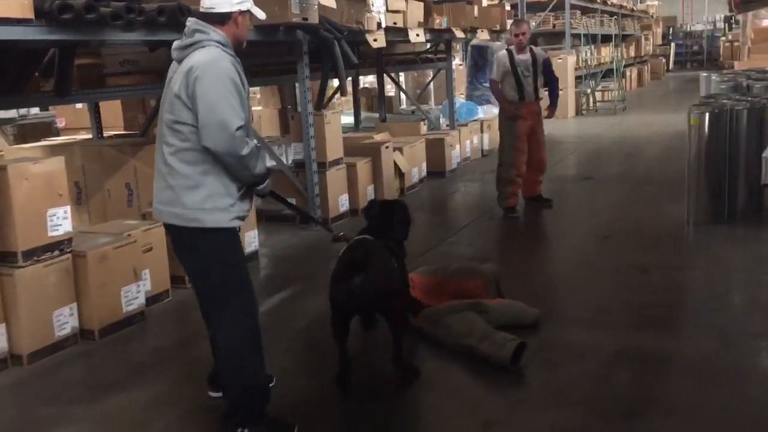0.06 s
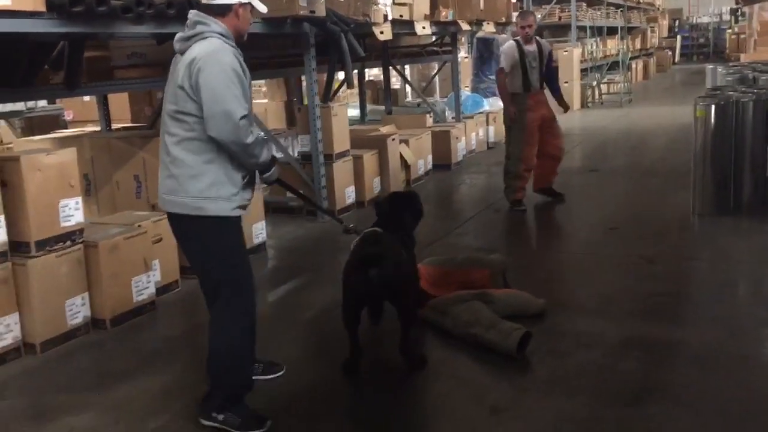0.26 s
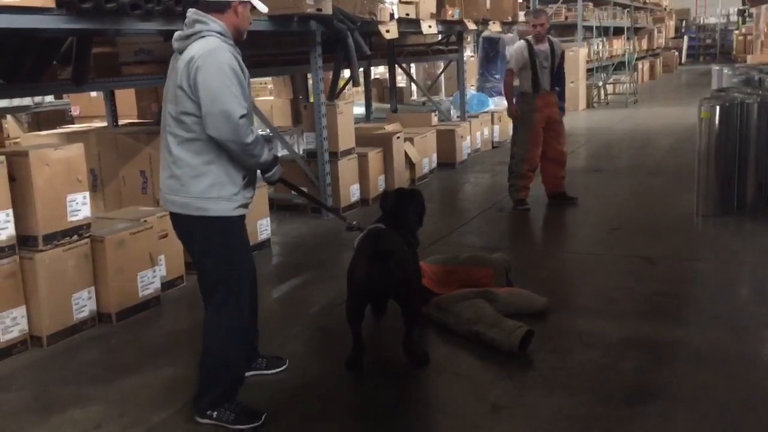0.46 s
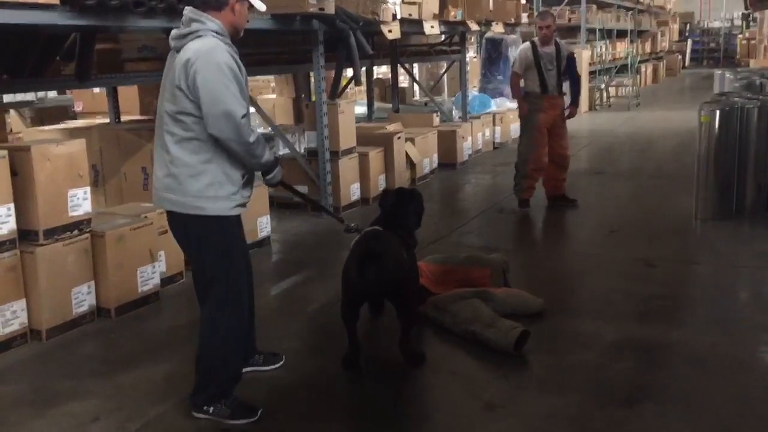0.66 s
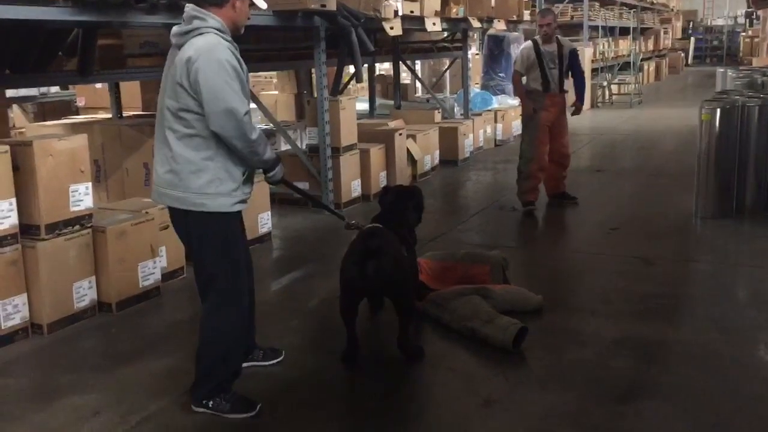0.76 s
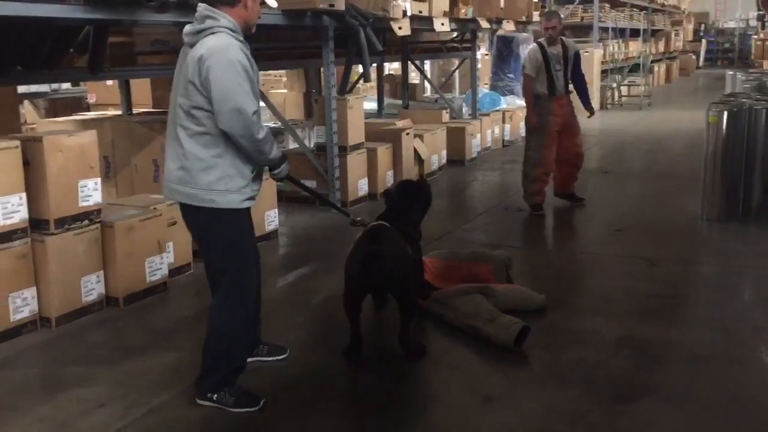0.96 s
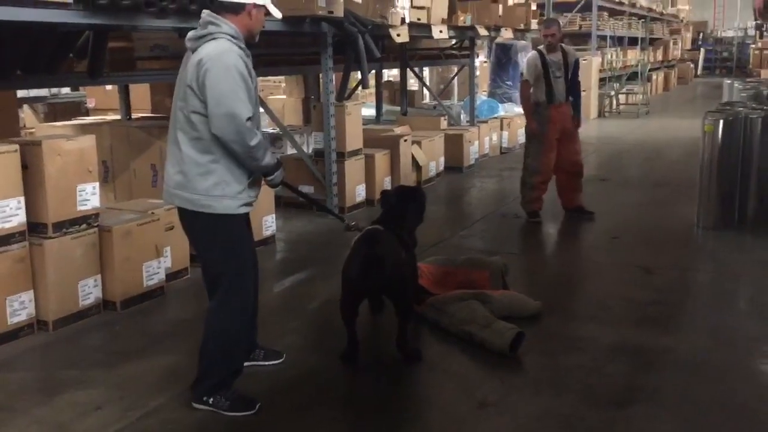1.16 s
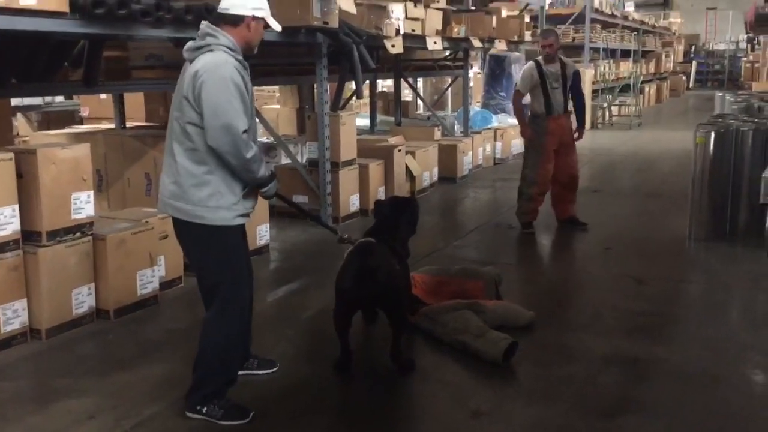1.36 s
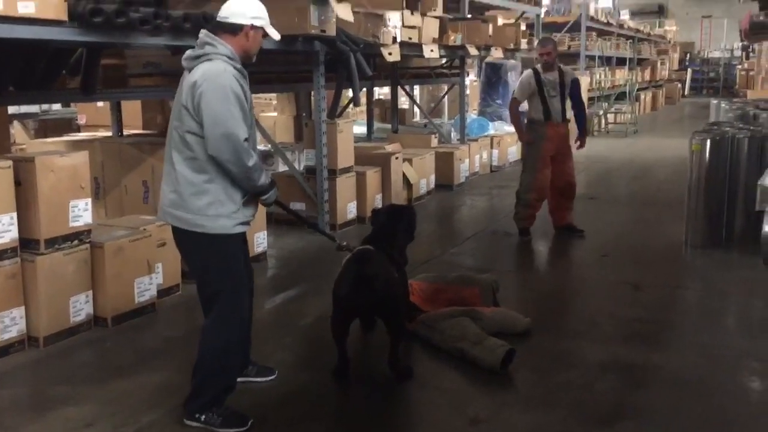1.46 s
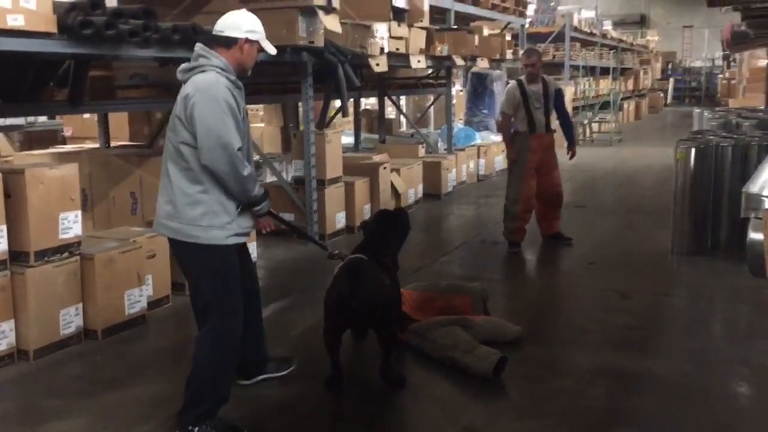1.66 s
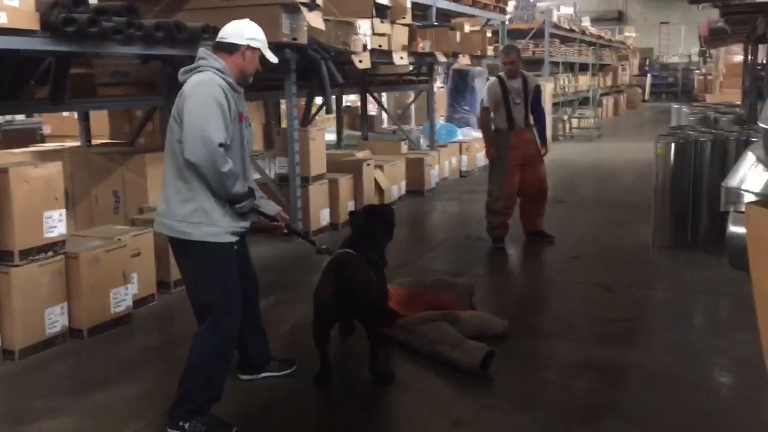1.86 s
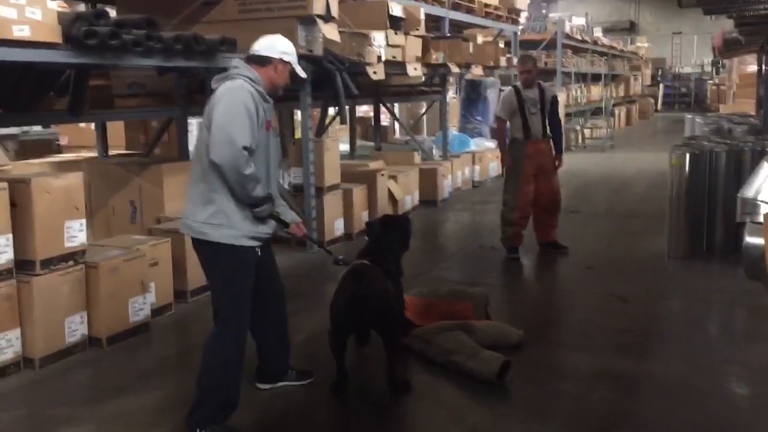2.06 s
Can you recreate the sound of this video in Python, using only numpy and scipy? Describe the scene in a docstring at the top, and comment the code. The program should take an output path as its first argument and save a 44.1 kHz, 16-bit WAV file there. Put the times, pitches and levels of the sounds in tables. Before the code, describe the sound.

The echo of an earlier bark fades, then a big dog barks three times, with a tiny shoe squeak and faint scuffs between; the warehouse racks and far wall return long reverberation, heard from a few metres.

```python
"""The echo of an earlier bark is dying away over faint ventilation; then a large dog barks three times.
It stands a few metres from the microphone in a big warehouse. Harmonics and puffs of noise excite a
throat filter that crossfades from an open burst to a hoarse, nearly shut hoot of falling pitch.
A leash rustles and shoes scuff (filtered noise); a rubber sole squeaks (a gliding tone). The racks
scatter it all, the hall reverberates and the far wall throws it back: decaying noise, convolved."""
import sys
import numpy as np
from scipy import signal
from scipy.io import wavfile
from scipy.ndimage import uniform_filter1d, minimum_filter1d

SR = 44100
rng = np.random.default_rng(int(sys.argv[2]) if len(sys.argv) > 2 else 0)


def store_wav(level_fs):
    """Save 16-bit WAV to argv[1]."""
    pcm = np.round(np.clip(np.atleast_2d(level_fs), -1, 1) * 32767)
    wavfile.write(sys.argv[1], SR, pcm.T.astype(np.int16))


N = 92610  # samples, 2.1 s

# Glottal course of each bark: [t/s, pitch f/Hz, level/dB, roughness/0-1]
BARKS = [
    [(0.184, 264.8, -29, 0.97), (0.208, 297.4, -15, 0.42), (0.234, 353.8, -8.5, 0.3),
     (0.25, 376.1, -11, 0.2), (0.268, 426.2, -9.5, 0.72), (0.282, 446.5, -14, 0),
     (0.315, 438.9, -15.5, 0.2), (0.336, 407.3, -21, 0.48), (0.35, 357.2, -15.5, 0),
     (0.372, 255.9, -22, .2), (0.42, 183.6, -35, 0.1)],
    [(0.902, 288.8, -26.5, 1), (0.92, 337.2, -13, 0.35), (0.942, 355.8, -9.5, 0.22),
     (0.968, 365.7, -10, 0.25), (0.984, 431.6, -21.5, 0), (1.014, 412.9, -17.5, 0.3),
     (1.032, 400.8, -22.5, .7), (1.046, 404.4, -13.5, 0.31), (1.059, 364.2, -12, 0.25),
     (1.08, 280.4, -20.5, 0.1), (1.145, 164, -43, 0)],
    [(1.618, 276.8, -26.5, 0.63), (1.632, 319.3, -18.5, 0.36), (1.657, 345.7, -10, 0.4),
     (1.68, 393, -13.5, 0.4), (1.713, 426, -24, 0.3), (1.74, 423.3, -15.5, .45), (1.761, 422.2, -21, 0.64),
     (1.774, 354.1, -11.5, 0.17), (1.794, 265.5, -19, 0.42), (1.85, 168, -34, 0)],
]
# How much each bark stresses the sharp upper throat resonance: [gain]; a negative gain weakens it
BITES = [0, 0.18, -0.39]
BITE_HZ, BITE_WIDTH_HZ = 1716, 200
# Period jitter (share of pitch at full roughness) and its bandwidth
JITTER, JITTER_HZ = 0.076, 172.8
# At full roughness: strong-weak alternation of cycles, random strength (shares), and its bandwidth
DOUBLING, SHIMMER, SHIMMER_HZ = 0.44, 0.64, 142
# Air in each cycle: decay (cycles), steady share beside a pulse of 1, high-pass corner
PUFF_CYCLES, PUFF_FLOOR, PUFF_LOW_HZ = 0.35, 0.9, 291.7
FOLDS_DB = -7.5  # voiced part against the puffs


def glottis(hz, rough, bite):
    """Source of the source-filter model: a harmonic series gives way to pulsed turbulence with roughness."""
    n = len(hz)
    turns = np.cumsum(hz * (1 + JITTER * rough * wobble(n, JITTER_HZ))) / SR  # cycles elapsed
    folds = sum(np.cos(2 * np.pi * k * turns) for k in range(1, 17))
    alternation = DOUBLING * np.cos(np.pi * turns)
    folds = folds * (1 + rough * (alternation + SHIMMER * wobble(n, SHIMMER_HZ)))
    airflow = PUFF_FLOOR + np.exp(-(turns % 1) / PUFF_CYCLES)
    puffs = cut(airflow * noise(n), PUFF_LOW_HZ, "high", order=6)
    drive = (1 - rough) * amp(FOLDS_DB) * unit(folds) + rough * unit(puffs)
    resonance = signal.iirpeak(BITE_HZ, BITE_HZ / BITE_WIDTH_HZ, SR)
    return drive + bite * signal.lfilter(*resonance, drive), puffs


# Mouth opening: [t/s since onset, openness/0-1]
MOUTH = [(0, 1), (.055, 1), (.09, 0.36), (.15, 0.37), (.2, 0)]
# Throat transfer with the mouth open, then nearly shut: [f/Hz, level/dB]
OPEN = [(30, -44), (170, -7.5), (335, -6.5), (520, 0), (690, 1.5), (870, -5.5), (1150, -8), (1360, -1.5),
        (1560, -14), (1720, -7), (1795, 3.5), (1880, -7), (2120, -20), (2330, -24), (2550, -29),
        (4000, -80), (15500, -97)]
SHUT = [(30, -82), (110, -15.5), (170, -12), (280, -10.5), (430, 6.5), (530, -13.5), (680, -10.5),
        (870, -12.5), (970, -26.5), (1120, -6), (1550, -23), (1720, -11.5), (1800, -10), (1900, -40.5),
        (2150, -45), (2600, -30), (4000, -49.5), (15500, -75)]
# Rasp of air in the open mouth: [f/Hz, level/dB], relative spectrum
RASP = [(1500, -38.5), (2400, -4), (3200, -2), (4200, -4.5), (4900, -11), (6500, -21.5), (8500, -21),
        (10500, -32.5), (15500, -33.5)]
# Rasp level when the voice is at RASP_AT_DB; dB gained per dB of voice
RASP_DB, RASP_AT_DB, RASP_GROWTH = -30, -7, 2.14
# Hiss through the teeth as the jaw closes: [f/Hz, level/dB], relative spectrum
TEETH = [(1500, 2.5), (2500, 1.5), (3300, -18), (4300, 1.5), (5200, -9.5), (6400, -1.5), (7400, -20),
         (9000, -19), (11000, -29), (15500, -28)]
TEETH_DB, TEETH_S, TEETH_SPREAD_S = -44.5, 0.12, 0.053  # peak level, its time, Gaussian spread
# Low noise thump under the loud onset: level against the voice, low-pass corner
THUMP_DB, THUMP_HZ = -40.5, 190
ATTACK_S, RELEASE_S = 0.014, 0.011


def bark(rows, bite):
    """Source-filter principle: the throat's resonances shape the glottal drive; noise bands add to it."""
    t, hz, db, rough = follow(rows)
    rough = np.clip(rough, 0, 1)
    n, age = len(t), t - t[0]
    drive, puffs = glottis(hz, rough, bite)
    mouth = np.clip(np.interp(age, *np.transpose(MOUTH)), 0, 1)
    voice = mouth * unit(colour(drive, OPEN)) + (1 - mouth) * unit(colour(drive, SHUT))
    low_noise = cut(cut(noise(n), THUMP_HZ, "low"), 30, "high")
    thump = amp(THUMP_DB) * mouth ** 2 * unit(low_noise)
    rasp_db = RASP_DB + RASP_GROWTH * (db - RASP_AT_DB)
    rasp = amp(rasp_db) * mouth * unit(colour(puffs, RASP))
    closing = np.exp(-.5 * ((age - TEETH_S) / TEETH_SPREAD_S) ** 2)
    hiss = amp(TEETH_DB) * closing * unit(colour(noise(n), TEETH))
    edges = np.clip(np.minimum(age / ATTACK_S, (t[-1] - t) / RELEASE_S), 0, 1)
    return edges * (amp(db) * (voice + thump) + rasp + hiss)


# Glide of the rubber sole: [t/s, pitch f/Hz, level/dB]
SQUEAK = [(.692, 3080, -65.5), (.708, 3550, -49.5), (.724, 3550, -54), (.737, 3800, -65), (.75, 3750, -66),
          (.76, 3800, -75.5)]
SQUEAK_JITTER, SQUEAK_OCTAVE_DB = .05, -14.5  # rms share of pitch; second harmonic against the first


def squeak():
    """Frequency modulation: phase integrates a rising, jittered pitch, with a weak second harmonic."""
    t, hz, db = follow(SQUEAK)
    phase = 2 * np.pi * np.cumsum(hz * (1 + SQUEAK_JITTER * wobble(len(t), 700))) / SR
    tone = np.sin(phase) + amp(SQUEAK_OCTAVE_DB) * np.sin(2 * phase)
    return amp(db) * unit(tone)


# Soft rustles and scuffs, a leash rustle at 0.168 s, then shoe scuffs: [t/s, length/s, level/dB]
RUSTLES = [(0.168, 0.05, -57), (0.475, 0.2, -59), (0.757, 0.012, -63), (1.236, 0.053, -61),
           (2.034, 0.023, -61)]
# Spectrum of a rustle or scuff: [f/Hz, level/dB]
RUSTLE_COLOUR = [(500, -15), (2500, 1), (6000, -4.5), (9000, -10), (15000, -19.5)]


def rustle(length, level):
    """Friction as broadband noise: filtered randomness under a smooth window."""
    n = int(length * SR)
    return amp(level) * np.hanning(n) ** .5 * unit(colour(noise(n), RUSTLE_COLOUR))


# Hall tail: decay [f/Hz, T60/s], then spectrum [f/Hz, level/dB]
HALL_T60 = [(100, .4), (250, .55), (430, 0.88), (900, 0.99), (1800, 1.07), (2600, 1.48), (4300, 0.96),
            (8000, 0.45), (15000, 0.71)]
HALL_COLOUR = [(100, 10), (340, -2.5), (395, 6), (435, 6.5), (490, -15.5), (800, -0.5), (1800, -10),
               (2800, -1.5), (6000, 3), (15000, 3.5)]
# Single reflections from floor and cartons: [delay t/s, gain]
BOUNCES = [(.0047, 0.1), (.0108, 0.2), (0.0179, 0.087)]
# What the far wall returns: [f/Hz, level/dB]
FAR_COLOUR = [(150, -18), (340, -2.5), (435, 7), (510, -6), (700, -0.5), (1300, -2), (1800, -1.5),
              (2500, -5), (7000, -16.5), (15000, -9)]
# Energy of each part against the direct sound (dB), build-up and decay times (s)
HALL_DB, HALL_SWELL_S = -10.5, 0.099
RACKS_DB, RACKS_SWELL_S, RACKS_T60 = -8.5, 0.002, 0.47
FAR_DB, FAR_S, FAR_SWELL_S, FAR_T60 = -29, 0.23, 0.073, 0.99  # FAR_S: the echo's delay


def warehouse(x):
    """Linear room acoustics: convolution with direct sound, reflections, scatter, tail and smeared echo."""
    t = np.arange(N) / SR
    hz, at, bands = signal.stft(colour(noise(N), HALL_COLOUR), SR, nperseg=512)
    decay = amp(-60 * at / read(HALL_T60, hz)[:, None])  # each band falls 60 dB in its own T60
    hall = signal.istft(bands * decay, SR, nperseg=512)[1][:N]
    hall = hall * np.clip(t / HALL_SWELL_S, 0, 1)
    racks = noise(N) * amp(-60 * t / RACKS_T60) * np.clip(t / RACKS_SWELL_S, 0, 1)
    far = colour(noise(N), FAR_COLOUR) * amp(-60 * t / FAR_T60)
    far = far * np.clip((t - FAR_S) / FAR_SWELL_S, 0, 1)
    parts = [(HALL_DB, hall), (RACKS_DB, racks), (FAR_DB, far)]
    response = sum(amp(db) * part / np.linalg.norm(part) for db, part in parts)
    response[0] += 1  # direct sound
    for s, gain in BOUNCES:
        response[round(s * SR)] += gain
    return signal.fftconvolve(x, response)[SR:SR + N]  # drops the early second


# Ventilation spectrum: [f/Hz, level/dB per Hz], relative
AIR = [(22, -55), (40, -14.5), (65, -12), (120, -6), (210, -19), (500, -14.5), (1500, -11), (3000, -45.5),
       (8000, -46), (15500, -61.5)]
AIR_DB = -50  # overall rms level


def ventilation():
    """Stationary random process: steady noise of fixed spectrum."""
    return amp(AIR_DB) * unit(colour(noise(N + SR), AIR)[SR:])


def amp(db):
    """Level definition: decibels to amplitude gain."""
    return 10 ** (np.asarray(db) / 20)


def unit(x):
    """Power normalisation: scales to rms 1."""
    return x / np.sqrt(np.mean(x ** 2) + 1e-20)


def read(points, hz):
    """Interpolation on a logarithmic frequency axis."""
    f, value = np.transpose(points)
    return np.interp(np.log(hz + 1), np.log(f + 1), value)


def follow(rows):
    """Linear interpolation in time: sample times and every other column."""
    s, *columns = np.transpose(rows)
    t = np.arange(s[0], s[-1], 1 / SR)
    return [t] + [np.interp(t, s, c) for c in columns]


def add(mix, s, sound):
    """Superposition: adds a sound to a track that begins one second early."""
    part = mix[round((s + 1) * SR):][:len(sound)]
    part += sound[:len(part)]


def noise(count):
    """White Gaussian noise: equal power at all frequencies."""
    return rng.standard_normal(N + SR)[:count]


def wobble(count, hz):
    """Band-limited random motion of rms 1."""
    return unit(cut(noise(count), hz, "low"))


def colour(x, points, size=4096):
    """Minimum-phase filtering: the Hilbert transform of log gain supplies a causal phase."""
    log_gain = np.log(amp(read(points, abs(np.fft.fftfreq(size, 1 / SR)))))
    taps = np.fft.ifft(np.exp(signal.hilbert(log_gain).conj())).real[:size // 2]
    return signal.fftconvolve(x, taps)[:len(x)]


def cut(x, hz, kind, order=2):
    """Butterworth filtering: maximally flat low-pass or high-pass."""
    return signal.sosfilt(signal.butter(order, hz, kind, fs=SR, output="sos"), x)


EARLIER_S, EARLIER_DB = -.53, 1.5  # a bark like the first, still echoing at the start


def scene():
    """Superposition: dog, leash and shoes share the room response; ventilation is added to it."""
    dry = np.zeros(N + SR)
    add(dry, SQUEAK[0][0], squeak())
    for s, length, level in RUSTLES:
        add(dry, s, rustle(length, level))
    for rows, bite in zip(BARKS, BITES):
        add(dry, rows[0][0], bark(rows, bite))
    add(dry, EARLIER_S, amp(EARLIER_DB) * bark(BARKS[0], BITES[0]))
    return (warehouse(dry) + ventilation())[None]


CEILING, EDGE_HZ = .7, 15700  # limiter threshold (full scale 1); upper band edge


def record(dry):
    """Peak limiting by a smoothed gain, then a linear-phase band limit."""
    gain = minimum_filter1d(np.minimum(1, CEILING / (abs(dry[0]) + 1e-9)), size=100)
    held = dry * uniform_filter1d(gain, size=100)
    low_pass = signal.firwin(511, EDGE_HZ, window=("kaiser", 9), fs=SR)
    return signal.oaconvolve(held, low_pass[None], "same")


dry = scene()
out = record(dry)
store_wav(out)
```